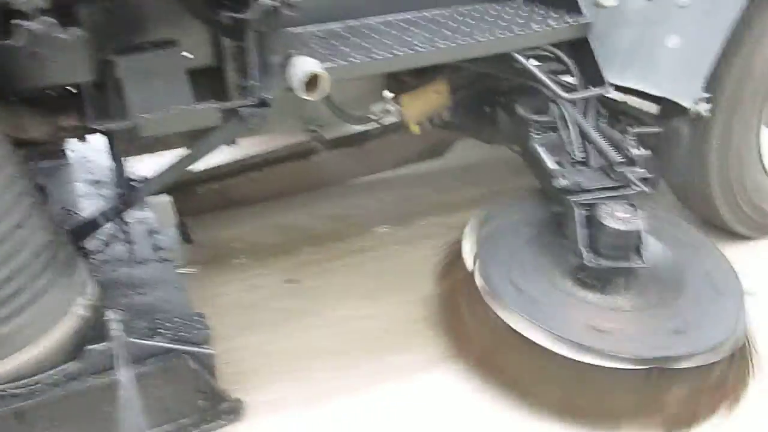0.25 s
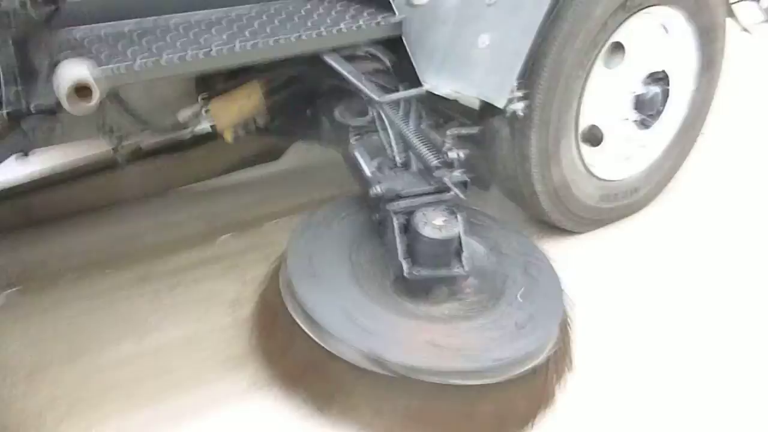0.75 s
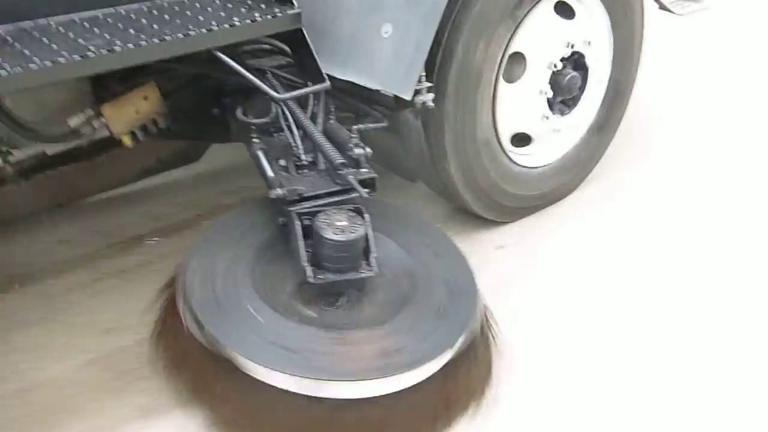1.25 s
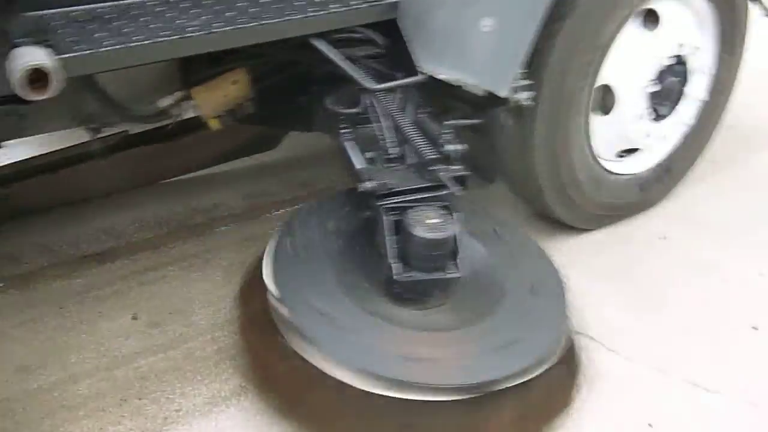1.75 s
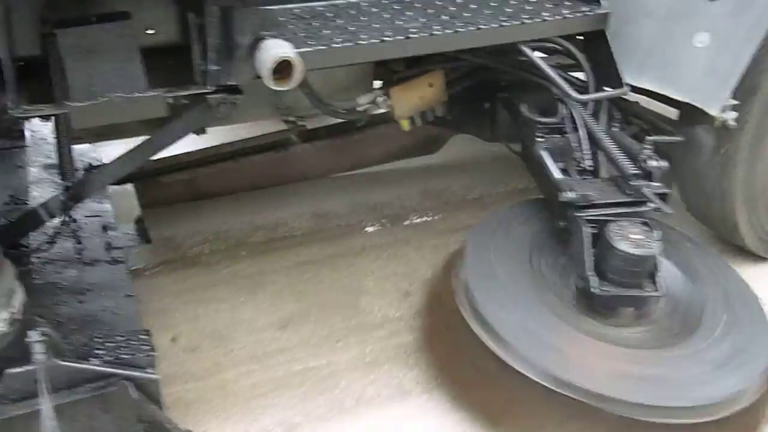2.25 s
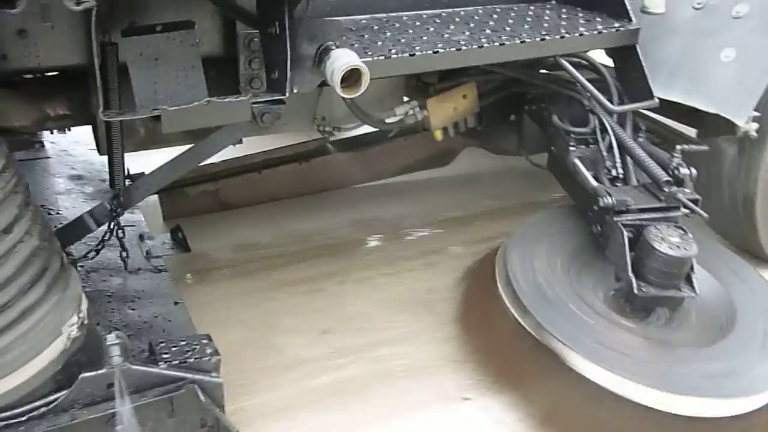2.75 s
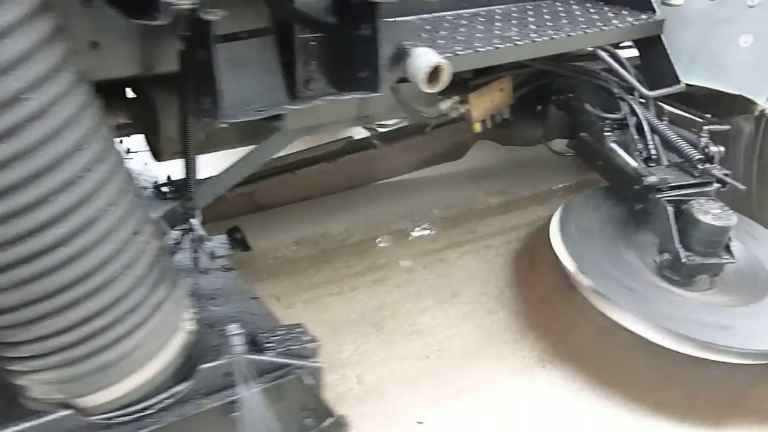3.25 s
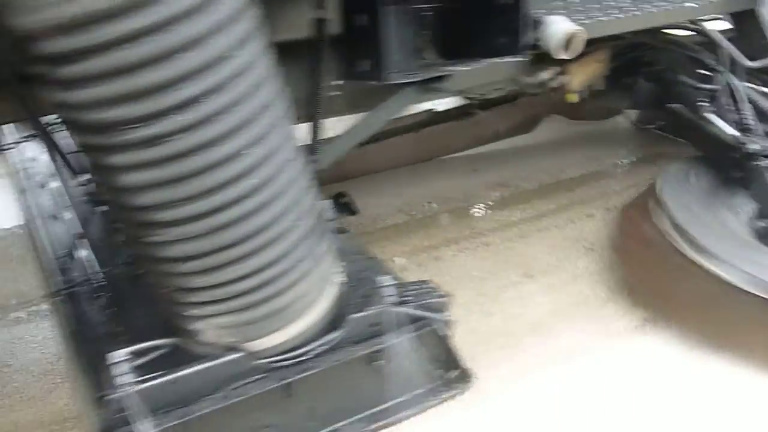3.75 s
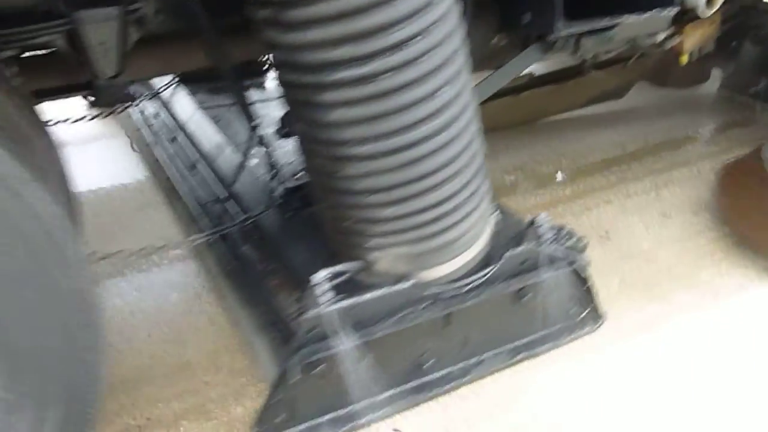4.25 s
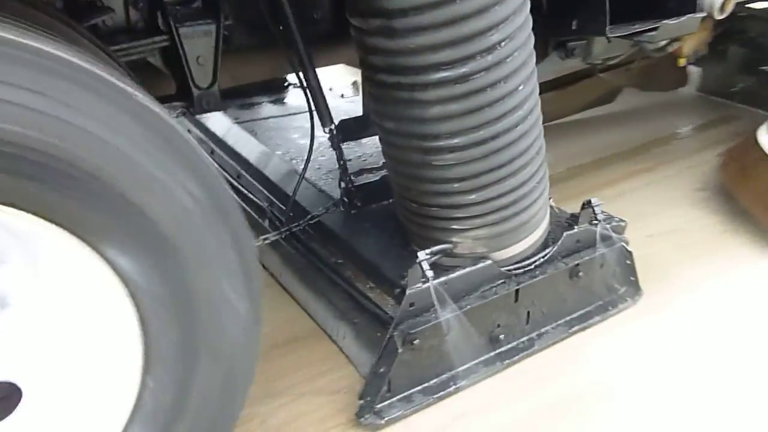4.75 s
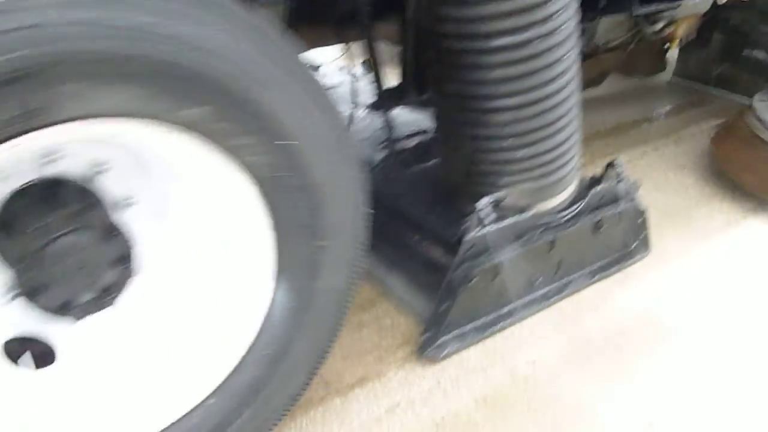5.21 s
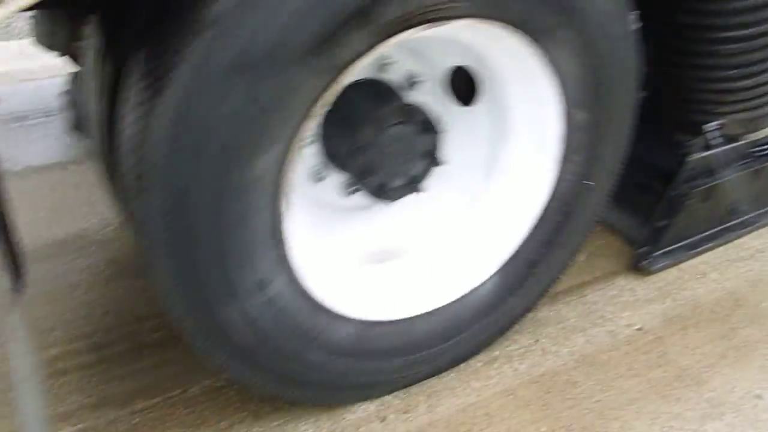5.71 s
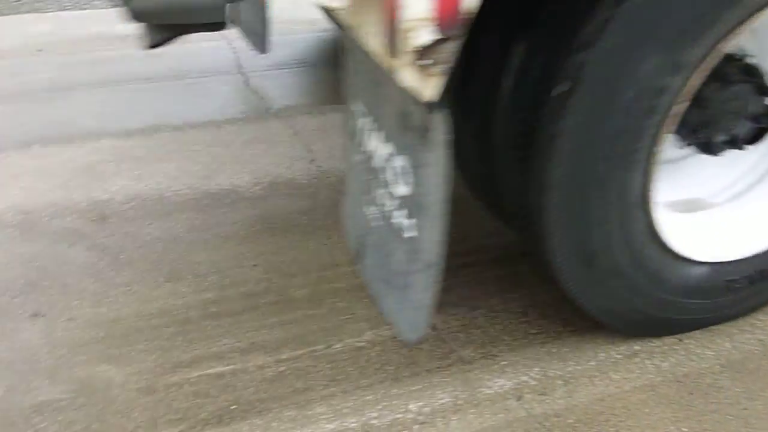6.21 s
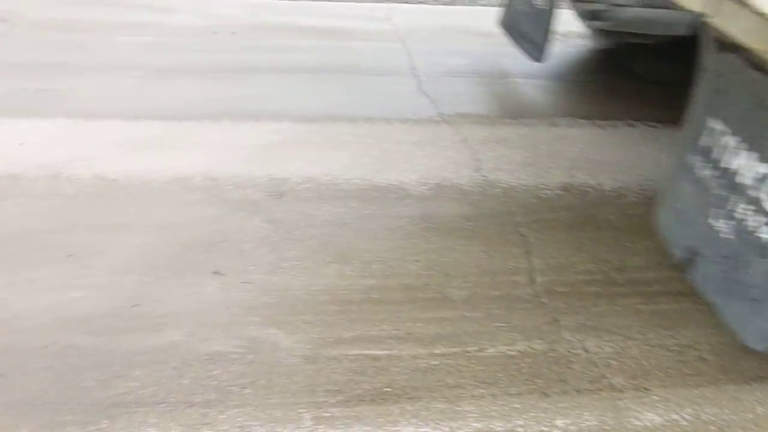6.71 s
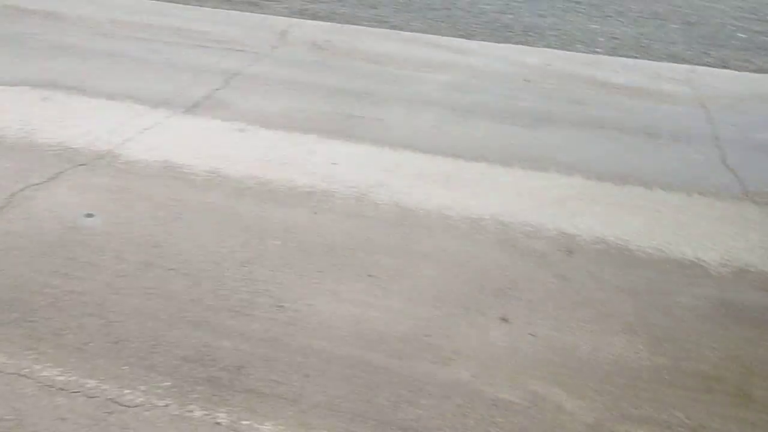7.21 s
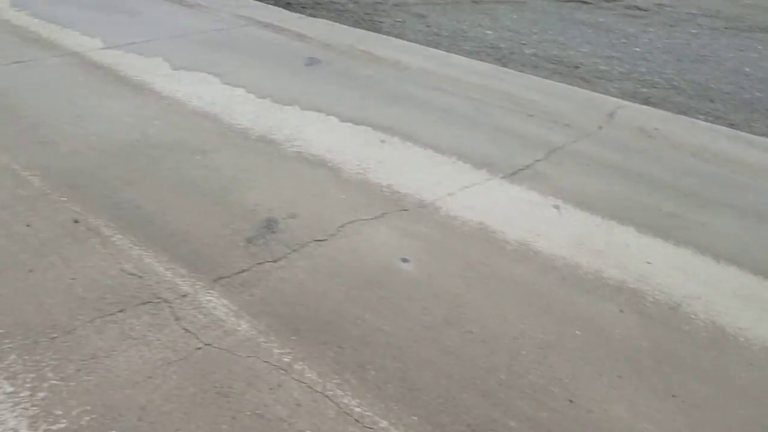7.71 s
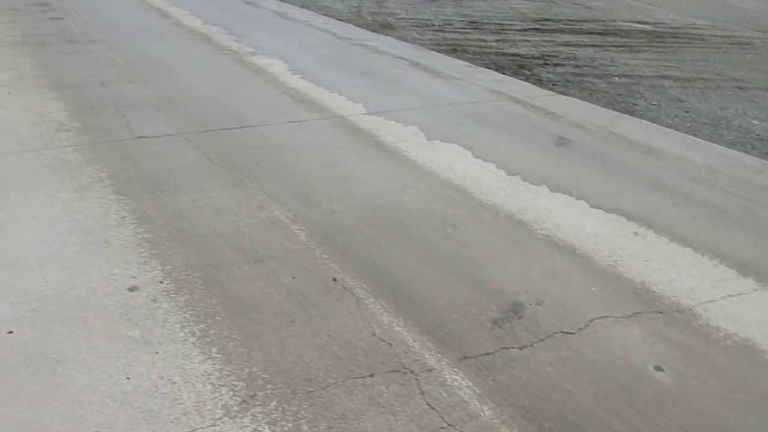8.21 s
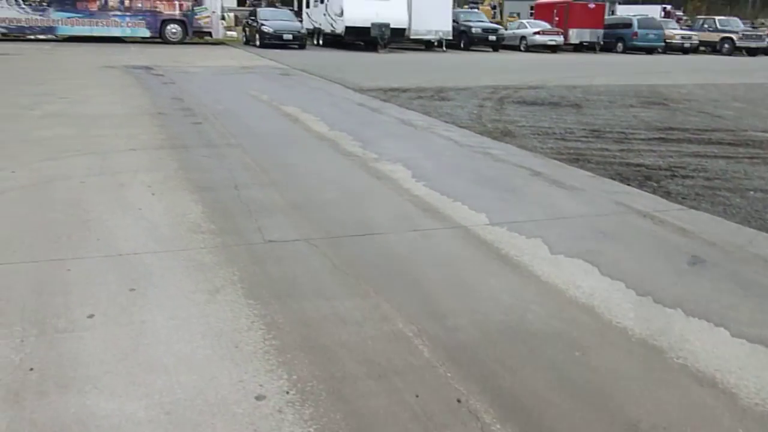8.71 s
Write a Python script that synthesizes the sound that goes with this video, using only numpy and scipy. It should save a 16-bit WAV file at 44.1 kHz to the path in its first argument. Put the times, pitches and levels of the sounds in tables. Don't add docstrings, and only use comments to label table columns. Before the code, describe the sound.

A sweeping truck crawls past close by, diesel humming, blower singing steadily, air roaring, bristles hissing on concrete, with one tiny metallic pebble clang.

```python
import sys
import numpy as np
from scipy import signal
from scipy.fft import rfft, irfft
from scipy.io import wavfile
from scipy.ndimage import uniform_filter1d

SR = 44100
rng = np.random.default_rng(int(sys.argv[2]) if len(sys.argv) > 2 else 0)


def master(y):
    cut = np.clip(np.atleast_2d(y).T, -1, 1)
    pcm = np.round(cut * 32767)
    wavfile.write(sys.argv[1], SR, pcm.astype(np.int16))


def makeup_ratio(level_db):
    decades = np.asarray(level_db, float) / 20
    return 10 ** decades


N = 395136
T = np.arange(N) / SR

FIRING_HZ = 60.225
CAMERA_RATE_HZ = 16000
TAIL_PASSES_S = (4.85, 6.5)

# [centre_s, change_db]
LULLS = [(.1, -1.5), (5.645, -3), (5.92, -2.5), (6.28, -1.5), (6.58, -2.5), (7.08, -2.5), (7.54, 1.5),
         (7.9, -3), (8.08, -1.5), (8.17, 1.5), (8.36, -1)]
# [start_s, peak_db]
PEBBLE_HITS = [
    (5.5965, -28),
    (5.6033, -17),
    (5.6052, -24.5),
    (5.6092, -24),
    (5.613, -30.5),
]
# [pitch_hz, level_db, t60_s]
PANEL_MODES = [(2400, -5, .015), (5100, -10.5, .008), (5970, -2.5, 0.019), (6440, -1.5, .014),
               (7000, -3, .006), (7770, 8.5, 0.009)]

# [time_s, level_db]
HUM_LEVEL = [(0, -27), (3.2, -26.5), (4.2, -27.5), (4.5, -29), (5.25, -28.5), (5.45, -31), (6.2, -29.5),
             (6.45, -32), (6.75, -42), (7.45, -44), (7.8, -33.5), (8.4, -36.5), (8.96, -33.5)]
# [multiple of the four-stroke cycle, beside_db, behind_db]
ENGINE_ORDERS = [(4, -56.5, -48), (9, -51, -49), (11, -43.5, -55.5), (12, -46.5, -38.5), (15, -46, -57),
                 (16, -53.5, -42.5), (20, -49.5, -41.5), (24, -45, -46)]
# [pitch_hz, density_db per Hz]
BLOCK_COLOUR = [(850, -26.5), (1020, -1), (1150, -4.5), (1260, -1.5), (1450, -5), (1600, -4.5),
                (1850, -9.5), (2300, -29.5)]
# [pitch_hz, density_db per Hz]
SUMP_COLOUR = [(1190, -30), (1250, 5), (1335, -1), (1380, -28.5)]
BLOCK_LEVEL = (-48, -50.5, (.8, 1.8, 6))
SUMP_LEVEL = (-53.5, -53.5, (2.95, .3, 11), (3.5, .45, 12), (5.1, .25, 6), (8.6, .35, 8))

# [pitch_hz, density_db per Hz]
RUMBLE_COLOUR = [(20, -19.5), (35, -19.5), (50, -7), (75, -2.5), (100, 0), (140, -24)]
# [pitch_hz, density_db per Hz]
BOOM_COLOUR = [(80, -15.5), (130, -2.5), (180, -0.5), (240, 0.5), (330, -14.5)]
# [pitch_hz, density_db per Hz]
ROAR_COLOUR = [(200, -15), (280, -3), (330, -0.5), (430, -3), (560, -5), (750, -18.5), (1000, -32.5)]
# [pitch_hz, density_db per Hz]
RUSH_COLOUR = [(400, -10), (600, 2.5), (760, -2), (950, -2.5), (1300, -3.5), (1700, -8), (2500, -31)]
RUMBLE_LEVEL = (-43.5, -37, (4.3, .25, 2), (5.3, .4, 4), (6.1, .25, 3), (6.95, .3, -2.5), (8.1, .15, 3))
BOOM_LEVEL = (-32.5, -32.5, (0.97, 0.44, 2.5), (5.2, 0.18, 1.7), (6.3, .3, 1.9), (7.6, .5, 2.5))
ROAR_LEVEL = (-31, -28.5, (2.35, .7, 3), (4.3, 1.0, 3), (5.4, .15, 2.5), (6.0, 0.27, -1.8), (7.25, .15, 2),
              (7.85, .35, 2.5), (9.3, .2, 1.5))
RUSH_LEVEL = (-34, -35, (.1, .3, -1.6), (4.7, .4, -1.8), (5.45, .2, -1), (6.7, .55, -2.5))
DUCT_LEVELS = [
    (-36, -30.5, (.75, .25, 5), (2.45, 0.084, 6), (3.1, .12, 4), (4.4, .5, 2.7), (6.0, 0.41, -2), (6.5, .08, 3.4), (6.7, .08, -5), (7.15, .1, 2.2), (8.35, .15, -2), (8.7, 0.11, 2.5)),
    (-39, -33, (.65, .15, -3), (4.23, 1.0, 5.5), (5.15, .3, 5.5), (5.75, .15, -2), (6.2, 0.24, -5)),
    (-43, -43, (.3, 0.76, 7), (3.32, 1.2, 7.3), (6.5, .9, 7.6)),
    (-45.5, -46, (7.5, .3, 4), (8.45, .3, 5)),
    (-44.5, -53, (.5, .3, 2), (4.7, .7, -2.5)),
]
# [pitch_hz, width_hz, share_db]
DUCT_MODES = [(357.4, 24, -2), (468, 26, -3), (698, 98, -4.5), (1131, 27, -6.5), (2195, 69, -5.5)]

# [time_s, pitch_hz]
BLADE_RATE = [(0, 262.05), (1, 262.05), (2, 262.25), (4, 262.2), (5.6, 262.0), (6.5, 261.6), (8.96, 261.55)]
# [time_s, level_db]
FIRST_TONE = [(0, -32), (.5, -29), (.8, -31), (1.3, -28), (1.7, -30.5), (2.2, -29), (3.4, -35),
              (4.4, -32.5), (5.05, -43), (5.4, -30), (5.87, -24.5), (6.5, -28.5), (7.0, -28), (7.3, -37),
              (7.5, -29.5), (7.75, -43.5), (8.3, -36), (8.96, -29)]
# [time_s, level_db]
SECOND_TONE = [(0, -29.5), (.35, -33), (.95, -34.5), (1.15, -45.5), (1.5, -45), (2.0, -29), (2.6, -24),
               (3.4, -22.5), (4.8, -24.5), (5.2, -34.5), (5.55, -28), (5.8, -28.5), (6.0, -44.5),
               (6.3, -32.5), (6.9, -24), (7.75, -29.5), (8.3, -26), (8.96, -37.5)]
# [centre_s, half_length_s, change_db]
DROP_OUTS = [
    (3.13, .1, -4),
    (7.7, .1, -7),
]
THIRD_LEVEL = (-53.5, -54, (3.2, .4, 9), (4.1, .45, 13), (4.9, .3, 6.3), (6.4, .35, 7.2), (7.4, .35, 7))
SIXTH_LEVEL = (-64, -60, (7.55, .5, 8))

# [time_s, level_db]
BRUSH_LEVEL = [(0, -33.5), (1.3, -33.5), (2.3, -33), (3.5, -34), (4.7, -35.5), (5.2, -34.5), (5.85, -34.5),
               (6.2, -36.5), (6.9, -37.5), (7.2, -37), (7.52, -36), (7.8, -38), (8.25, -38), (8.7, -38),
               (8.96, -37)]
# [pitch_hz, density_db per Hz]
BRISTLE_COLOUR = [(900, -27), (1400, -3), (1800, -1), (2200, 0), (2800, -2.5), (4000, -4.5), (5000, -6),
                  (6300, -9), (7200, -10), (9500, -6.5)]
BRUSH_TREBLE = (1.2, .2, (7.5, .7, -1))

# [pitch_hz, gain_db]
CAMERA_TREBLE = [(10, 0), (6800, 0), (7500, -3.5), (8000, -10.5), (8400, -17), (8700, -25), (8950, -36),
                 (9170, -54), (9600, -80)]


def curve(table):
    time_s, value = np.transpose(table)
    return np.interp(T, time_s, value)


def unit(x):
    return x / np.sqrt(np.mean(x ** 2))


def walk(rate):
    hold = int(SR / rate)
    steps = np.repeat(rng.standard_normal(N // hold + 1), hold)
    slewed = uniform_filter1d(uniform_filter1d(steps, hold), hold)
    return unit(slewed[:N])


def sway(rate):
    x = walk(rate)
    return unit(x - uniform_filter1d(x, int(5 * SR / rate)))


def passing(beside_db, behind_db, *swells):
    db = np.interp(T, TAIL_PASSES_S, (beside_db, behind_db))
    return db + sum(g * np.exp(-((T - s) / half) ** 2) for s, half, g in swells)


def frequencies():
    return np.maximum(np.fft.rfftfreq(N, 1 / SR), 1)


def colour(x, points):
    hz, db = np.transpose(points)
    gain_db = np.interp(np.log(frequencies()), np.log(hz), db, left=-90, right=-90)
    return irfft(rfft(x) * makeup_ratio(gain_db), N)


def patchy(x, points, patchy_db, rate):
    spectrum = rfft(colour(x, points))
    low_hz, high_hz = points[0][0], points[-1][0]
    place = 2 * np.log2(frequencies() / low_hz)
    out = np.zeros(N)
    for b in range(int(2 * np.log2(high_hz / low_hz)) + 2):
        band = irfft(spectrum * np.clip(1 - abs(place - b), 0, 1), N)
        out += makeup_ratio(patchy_db * sway(rate)) * band
    return unit(out)


def tone(phase, db, waver_db, rate):
    level = np.sqrt(2) * makeup_ratio(db + waver_db * sway(rate))
    return level * np.sin(phase + 2 * np.pi * rng.random())


def gusts():
    lull_half_s = 0.046
    lulls_db = passing(0, 0, *((s, lull_half_s, db) for s, db in LULLS))
    return 0.25 * sway(12.0) + lulls_db


def pebbles():
    out = np.zeros(N)
    t = T[:SR // 20]
    for start_s, peak_db in PEBBLE_HITS:
        ring = np.zeros(len(t))
        for hz, level_db, t60 in PANEL_MODES:
            decay = np.exp(-np.log(1000) * t / t60)
            ring += makeup_ratio(level_db + 1.5 * rng.standard_normal()) * np.sin(2 * np.pi * hz * t) * decay
        start = int(start_s * SR)
        out[start:start + len(t)] += makeup_ratio(peak_db - 11.0) * ring
    return out


def engine():
    cycle = 2 * np.pi * FIRING_HZ / 4 * T
    hum = tone(8 * cycle, curve(HUM_LEVEL), np.interp(T, TAIL_PASSES_S, (.4, 3.0)), 9.0)
    weak = sum(tone(round(k) * cycle, passing(beside_db, behind_db), 1.3, 3.0)
               for k, beside_db, behind_db in ENGINE_ORDERS)
    count = int(N / SR * FIRING_HZ)
    firing_s = np.arange(count) / FIRING_HZ + 4.5e-5 * rng.standard_normal(count)
    firings = np.zeros(N)
    firings[np.clip(firing_s * SR, 0, N - 1).astype(int)] = makeup_ratio(2.0 * rng.standard_normal(count))
    smear = signal.chirp(T[:SR // 60], 700, 1 / 60, 2400) * signal.windows.tukey(SR // 60, .2)
    knock = signal.fftconvolve(firings, smear)[:N]
    block = makeup_ratio(passing(*BLOCK_LEVEL)) * unit(colour(knock, BLOCK_COLOUR))
    rough = unit(firings) + rng.standard_normal(N)
    sump = makeup_ratio(passing(*SUMP_LEVEL)) * unit(colour(rough, SUMP_COLOUR))
    return hum + weak + block + sump


def turbulence(points, patchy_db, rate):
    return patchy(rng.standard_normal(N), points, patchy_db, rate)


def ducts():
    out = np.zeros(N)
    for level, (hz, width_hz, share_db) in zip(DUCT_LEVELS, DUCT_MODES):
        db = passing(*level)
        ring = signal.lfilter(*signal.iirpeak(hz, hz / width_hz, fs=SR), rng.standard_normal(N))
        swell_db = 0.78 * (db - db.mean())
        out += makeup_ratio(db + swell_db + share_db + 0.96 * sway(9.0)) * unit(ring)
    return out


def air(gust_db):
    surge_db = 0.92 * sway(6.0)
    roar_db = passing(*ROAR_LEVEL) - 2.0 + surge_db + 0.25 * gust_db
    rush_db = passing(*RUSH_LEVEL) + 1.23 + 1.1 * gust_db
    rumble = makeup_ratio(passing(*RUMBLE_LEVEL)) * turbulence(RUMBLE_COLOUR, 0.74, 3.0)
    boom = makeup_ratio(passing(*BOOM_LEVEL) - .7 + surge_db) * turbulence(BOOM_COLOUR, 0.36, 2.8)
    roar = makeup_ratio(roar_db) * turbulence(ROAR_COLOUR, 0.56, 6.2)
    rush = makeup_ratio(rush_db) * turbulence(RUSH_COLOUR, 0.72, 5.0)
    return rumble + boom + roar + rush + ducts()


def blower():
    sway_db, sway_rate = 0.74, 10.0
    first_db = curve(FIRST_TONE) + 1.6 * sway_db * sway(sway_rate)
    second_db = curve(SECOND_TONE) + passing(0, 0, *DROP_OUTS) + sway_db * sway(sway_rate)
    blade = 2 * np.pi * np.cumsum(curve(BLADE_RATE)) / SR + 0.11 * walk(15.0)
    first = tone(blade, first_db, 1.0, 22.0)
    second = tone(2 * blade, second_db, 0.87, 22.0)
    third = tone(3 * blade, passing(*THIRD_LEVEL) - .7, 2.5, 16.0)
    sixth = tone(6 * blade, passing(*SIXTH_LEVEL), 2.0, 8.0)
    return first + second + third + sixth


def brush(gust_db):
    throb_hz, throb_db, throb_start_s = 5.37, .75, .057
    ticks = rng.standard_normal(N) * makeup_ratio(1.6 * rng.exponential(size=N)) * makeup_ratio(0.5 * walk(45.0))
    hiss = patchy(ticks, BRISTLE_COLOUR, 0.34, 6.5)
    treble = colour(hiss, [(10, -60), (2500, -28.5), (5000, -1), (22050, -0.5)])
    treble_gain = makeup_ratio(passing(*BRUSH_TREBLE)) - 1
    depth_db = throb_db * np.interp(T, TAIL_PASSES_S, (1, .4))
    throb = makeup_ratio(depth_db * np.cos(2 * np.pi * throb_hz * (T - throb_start_s)))
    return makeup_ratio(curve(BRUSH_LEVEL) + gust_db + 0.32) * throb * (hiss + treble_gain * treble)


def scene():
    gust_db = gusts()
    return (pebbles() + engine() + air(gust_db) + blower() + brush(gust_db))[None]


def band_limit(x):
    return signal.sosfilt(signal.butter(12, 9170, fs=SR, output="sos"), x)


def record(dry):
    soft = np.tanh(2.46 * dry) / 2.305
    soft = soft - .22 * (soft ** 2 - np.mean(soft ** 2))
    sampled = colour(soft, [(1, 0), (CAMERA_RATE_HZ / 2, 0)])
    imaged = sampled * (1 + 2 * np.cos(2 * np.pi * CAMERA_RATE_HZ * T))
    offset = .0095
    return band_limit(colour(imaged, CAMERA_TREBLE) + offset)


dry = scene()
out = record(dry)
master(out)
```